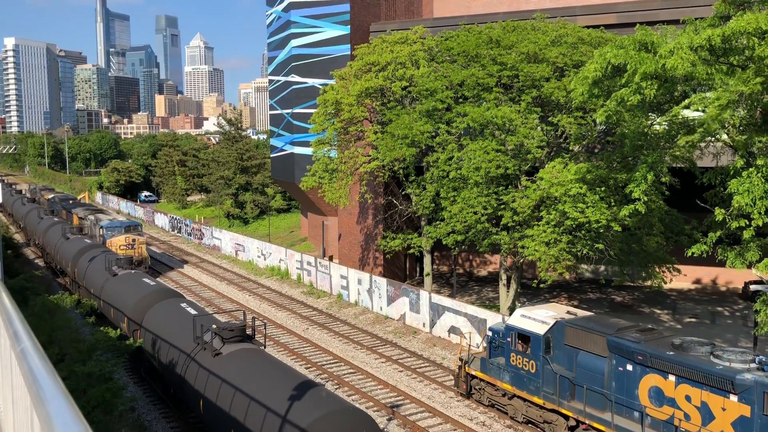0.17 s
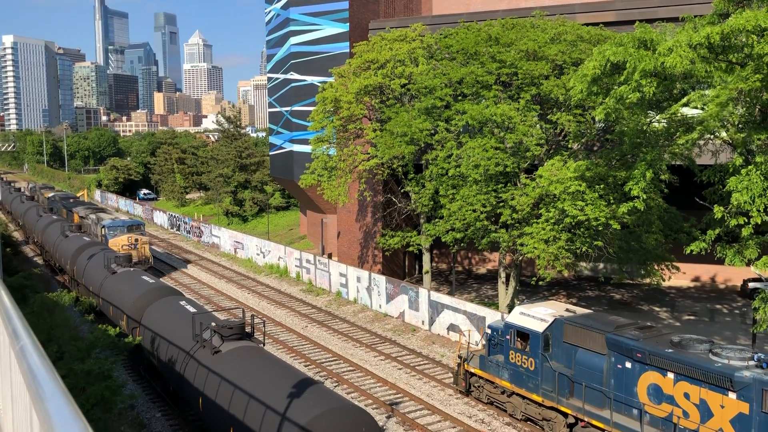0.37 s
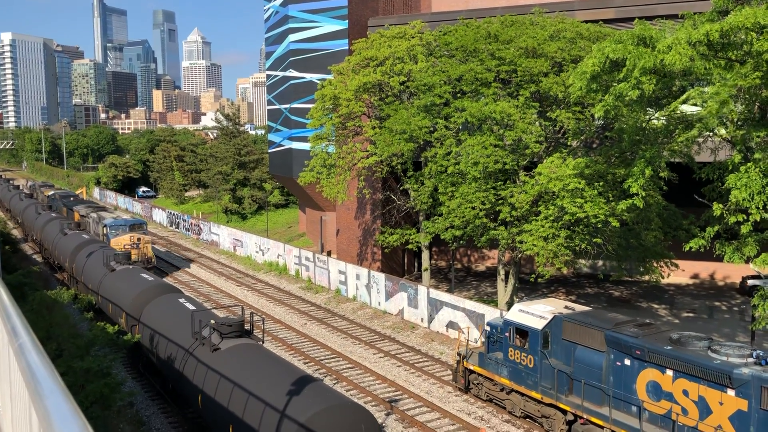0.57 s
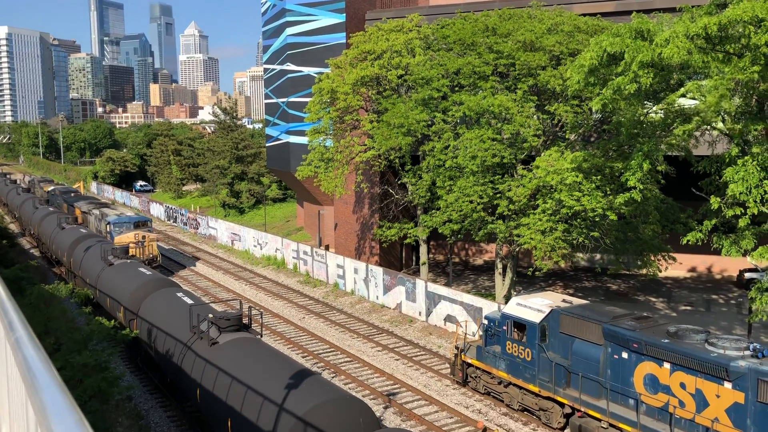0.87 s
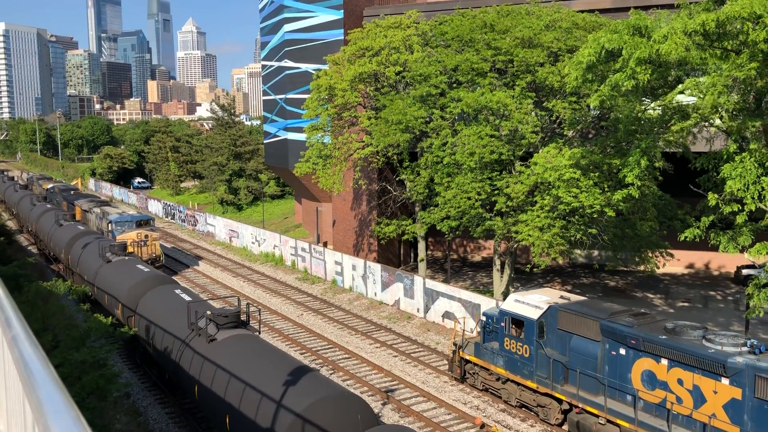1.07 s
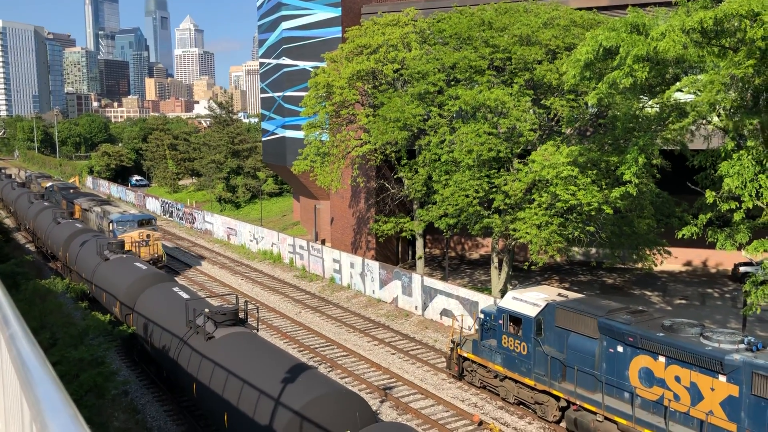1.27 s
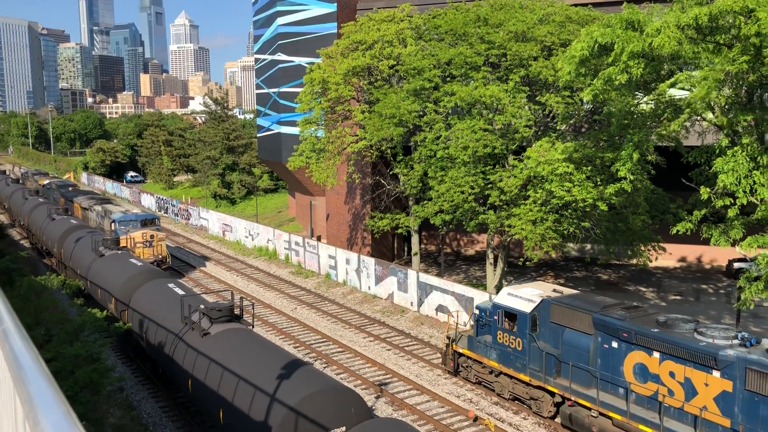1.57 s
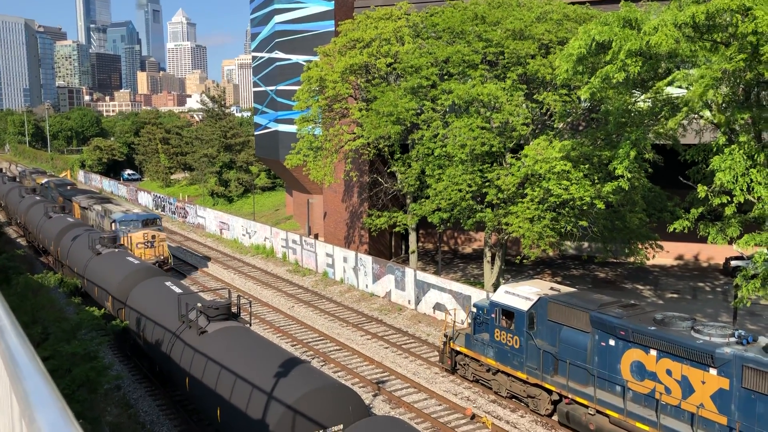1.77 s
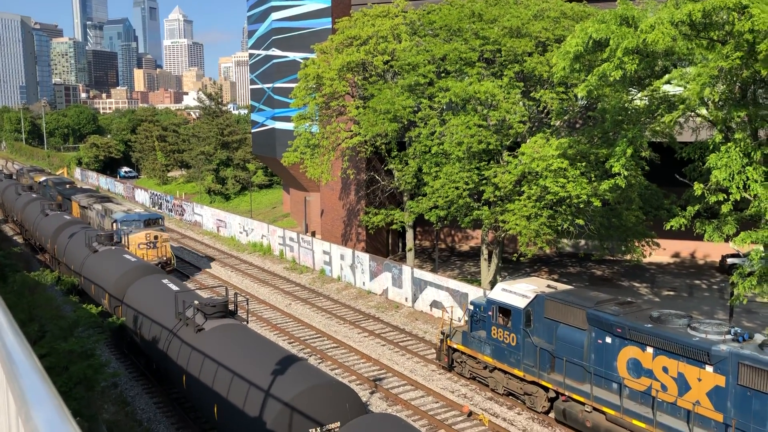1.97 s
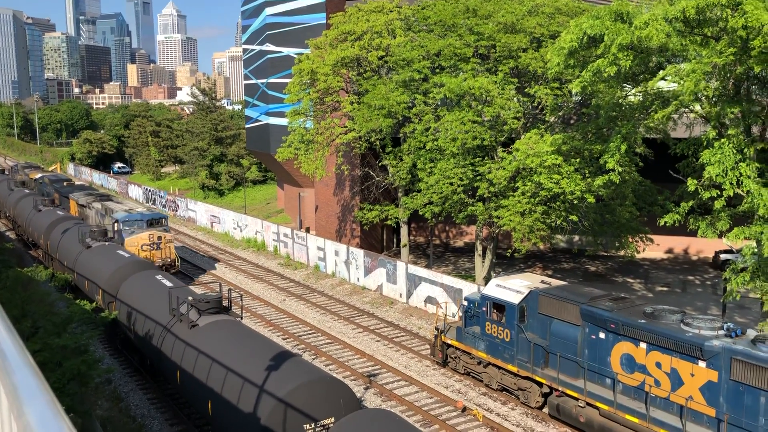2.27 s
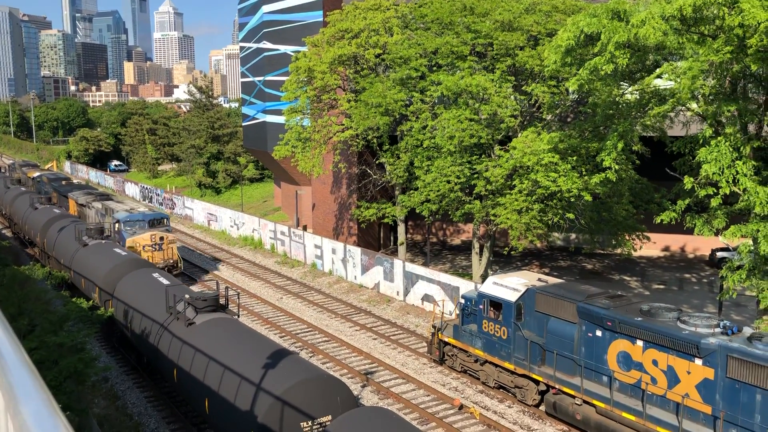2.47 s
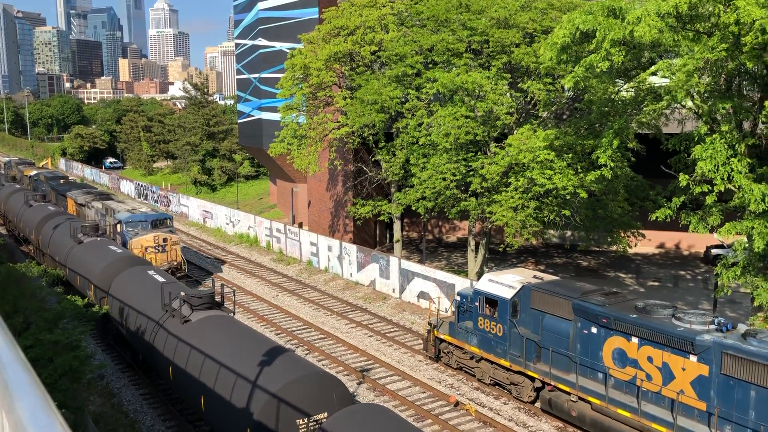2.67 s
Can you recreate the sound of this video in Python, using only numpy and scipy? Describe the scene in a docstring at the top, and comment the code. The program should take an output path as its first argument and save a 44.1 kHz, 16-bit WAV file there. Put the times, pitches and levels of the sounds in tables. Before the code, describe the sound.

Heavy diesel locomotive engines drone steadily below, rumbling and whining while wind puffs bump the microphone

```python
"""In a cutting below the microphone two big sixteen-cylinder two-stroke diesel locomotives idle, out of step.
Trains of uneven firing impulses excite exhaust resonances and beat; engine orders, gears and turbocharger
whine as sines; the turbocharger whistles hoarsely as noise-modulated carriers; fans and machinery roar
as shaped noise. Brief bursts of low resonant noise are puffs of wind that thump the microphone."""
import sys
import numpy as np
from scipy import signal
from scipy.fft import rfft, irfft, next_fast_len
from scipy.io import wavfile

SR = 44100
rng = np.random.default_rng(int(sys.argv[2]) if len(sys.argv) > 2 else 0)


def volts_from_db(level):
    """Convert decibel levels to linear amplitude ratios."""
    exponent = np.asarray(level, float) / 20
    return 10 ** exponent


def master(y):
    """Save y as 16-bit WAV."""
    cut = np.clip(np.atleast_2d(y).T, -1, 1)
    pcm = np.round(cut * 32767)  # scale
    wavfile.write(sys.argv[1], SR, pcm.astype(np.int16))


N = 124803
T = np.arange(N) / SR  # s
HZ = np.arange(N // 2 + 1) * SR / N
CRANK_HZ = 5.243  # turns per second of the first locomotive


def level(x, db):
    """Normalisation: the signal is scaled to an rms level in dB."""
    return x * volts_from_db(db) / np.sqrt(np.mean(x ** 2))


def ring(hz, width):
    """Second-order resonance: complex response with gain 1 at its centre and a half-power width in Hz."""
    return 1j * HZ * width / (hz ** 2 - HZ ** 2 + 1j * HZ * width)


def walk(rate):
    """Random modulation: white noise under a Gaussian low-pass of about rate Hz, standard deviation 1."""
    size = next_fast_len(N)
    hz = np.arange(size // 2 + 1) * SR / size
    low_pass = np.exp(-(hz / rate) ** 2) * (hz > 0)  # no steady offset
    wander = irfft(rfft(rng.standard_normal(size)) * low_pass, size)[:N]
    return wander / wander.std()


def curve_gain(points):
    """Slow envelope: gain interpolated in dB between points of (s, dB)."""
    seconds, db = np.array(points).T
    return volts_from_db(np.interp(T, seconds, db))


def swing(depth, at):
    """Amplitude modulation: the gain rises and falls once a crank turn, loudest at turn fraction at."""
    return 1 + np.clip(depth, 0, 1) * np.cos(2 * np.pi * (CRANK_HZ * T - at))


def twisted(turns, depth, at):
    """Single-sideband modulation: one lower side tone rocks level and pitch together once a crank turn."""
    side_turns = turns - CRANK_HZ * T + at
    return np.sqrt(2) * (np.sin(2 * np.pi * turns) + depth * np.sin(2 * np.pi * side_turns))


def firings(crank_hz, first_s, cylinders):
    """Impulse excitation: one uneven blow per cylinder and crank turn rings the exhaust."""
    # Exhaust resonances. Each row: centre in Hz, width in Hz, gain in dB.
    exhaust = [(47, 6.4, -7.5), (167.3, 48, -18), (254.5, 69, -20.5), (407, 43, -28), (580, 93, -31),
               (770, 350, -32)]
    firing_db, scatter_db, scatter_ms = -35.5, .8, .15
    turns = int(N / SR * crank_hz) + 1
    strength_db, lag_ms = np.tile(np.array(cylinders), (turns, 1)).T
    time_chance, strength_chance = rng.standard_normal((len(lag_ms), 2)).T
    even_s = first_s + np.arange(len(lag_ms)) / len(cylinders) / crank_hz
    at = even_s + (lag_ms + scatter_ms * time_chance) / 1000
    blows = np.zeros(2 * N)
    blows[(at * SR).astype(int)] = volts_from_db(strength_db + scatter_db * strength_chance)
    boom = ring(80, 30) ** 2  # main boom of the exhaust stack
    pipe = boom + sum(volts_from_db(db) * ring(hz, width) ** 2 for hz, width, db in exhaust)
    return irfft(rfft(blows[:N]) * pipe, N) * volts_from_db(firing_db) * SR / crank_hz / 2


def engines():
    """Beating: two periodic firing patterns at slightly different crank rates drift against each other."""
    # Cylinders of each locomotive in firing order.
    # Each row: relative strength in dB, lag through the exhaust manifold in ms.
    first_cylinders = [(-1.9, -3.0), (-7.2, 3.7), (-2.4, -2.7), (-3.3, -1.5), (-1.0, -1.9), (-2.8, -1.3),
                       (-5.7, -4.5), (-8.5, -2.1), (-3.9, -3.3), (-5.4, -0.1), (-2.2, 3.9), (-7.1, 1.5),
                       (-7.4, 3.3), (-4.4, 4.6), (-2.1, -0.7), (1.8, 2.6)]
    second_cylinders = [(-6.4, 4.1), (-4.7, -0.4), (-3.1, 4.5), (-2.2, 0.1), (-2.4, 3.7), (-3.4, -3.3),
                        (-3.4, 3.8), (0.1, -2.7), (-8.5, 1.4), (-1.7, -4.0), (-4.9, -0.7), (-2.6, -4.5),
                        (-9.7, -4.1), (-9.2, 1.2), (-3.3, -3.0), (-7.9, 4.1)]
    first = firings(CRANK_HZ, first_s=.014, cylinders=first_cylinders)
    second = firings(crank_hz=5.311, first_s=.012, cylinders=second_cylinders)
    return first + second


def whines():
    """Tonal radiation: engine-order, gear and turbocharger tones wander a little in level and pitch."""
    # Each row: tone in Hz, level in dB rms before its side tone, relative side tone (0 for none),
    # loudest point as a fraction of a crank turn, level wander in dB.
    tones = [(67.3, -38, 0, 0, 1), (71.7, -44, 0, 0, 2), (162.5, -39.5, 0, 0, 1.5), (188.7, -45, 0, 0, 2),
             (256.9, -44, 0, 0, 2), (262.2, -45, 0, 0, 2), (419.5, -43, 1, .66, 1.5),
             (690.4, -46, .1, 0, 2), (756.5, -44.5, .05, .2, 3), (760.2, -50, 0, 0, 2),
             (839.2, -48, .1, 0, 2), (1242.6, -45, .15, .8, 2), (1263.9, -55, .1, 0, 2),
             (1479.7, -49, .1, 0, 2), (1518.3, -44, .75, .96, 2), (1585.4, -54, .1, 0, 2),
             (1889.8, -59, .1, 0, 2), (2268, -58, .3, 0, 2), (2485.2, -61, .1, 0, 2), (2520, -62, .4, 0, 2),
             (2707.1, -56, .2, 0, 2), (2726.6, -61, .1, 0, 2), (2811.6, -55, .2, 0, 2),
             (2911.7, -63, .1, 0, 2), (3018, -58, .6, 0, 2), (3398, -63, .1, 0, 2), (3525.3, -65, .1, 0, 2),
             (3586.7, -62, .1, 0, 2), (3649, -64, .1, 0, 2), (3777.5, -59, .2, 0, 2),
             (3793.2, -62, .1, 0, 2), (4429, -50, .5, .4, 4), (4476, -48.5, .5, .4, 4),
             (4519, -52, .5, .4, 4), (4562, -61, .3, .4, 3), (5343, -68, .1, 0, 2)]
    drift_hz, wander_per_s = .25, 3
    total = 0
    for hz, db, depth, at, wander_db in tones:
        gain = volts_from_db(db + wander_db * walk(wander_per_s))
        turns = np.cumsum(hz + drift_hz * walk(wander_per_s)) / SR + rng.random()
        total = total + gain * twisted(turns, depth, at)
    return total


def gear_whine(hz, depth, at, points):
    """Amplitude modulation of a sine: a strong gear tone follows a level curve and the crank's swing."""
    return curve_gain(points) * swing(depth, at) * np.sqrt(2) * np.sin(2 * np.pi * hz * T)


def gear_whines():
    """Superposition: the loudest gear whine and a lower one add as independent tones."""
    # Level curves of the two whines. Each row: time in seconds, level in dB rms before the crank's swing.
    main_points = [(0.0, -38), (0.86, -41.5), (0.9, -38), (1.03, -48), (1.09, -38.5), (1.82, -42),
                   (1.9, -40), (2.77, -42), (2.83, -41)]
    low_points = [(0, -44), (.15, -41.5), (.45, -46), (.85, -42), (1.3, -43), (2.0, -42), (2.3, -43),
                  (2.5, -47), (2.83, -46)]
    main = gear_whine(hz=2769.1, depth=.2, at=.85, points=main_points)
    low = gear_whine(hz=2095.6, depth=.25, at=.55, points=low_points)
    return main + low


def whistles():
    """Turbulent scattering: quadrature noise spreads blade tones into fuzzy bands, overtones wider."""
    # Each row: blade rate in Hz, spread in Hz, swing per crank turn from 0 to 1,
    # loudest point as a fraction of a turn, list of levels in dB rms of blade tone and overtones.
    blade_tones = [(4456, 66, 0.18, 0.38, [-40.3, -57, -67.5]), (5834, 100, 0.2, 0.7, [-51])]
    # Shared swell of the blade tones. Each row: time in seconds, relative level in dB.
    swell_points = [(0, 1), (.45, -0.5), (.7, -2.3), (1.1, -4), (1.35, 0.5), (1.55, -1), (2.2, -4.5),
                    (2.45, 1), (2.83, -7)]
    waver_hz, wavers_per_s = 13, 10
    skirt_share, skirt_wider = .35, 2.6  # grainy spread around a whistle
    swell = curve_gain(swell_points)
    total = 0
    for hz, spread, depth, at, dbs in blade_tones:
        turns = np.cumsum(hz + waver_hz * walk(wavers_per_s)) / SR
        for k, db in enumerate(dbs, 1):
            phase = 2 * np.pi * k * turns
            a, b = (walk(k * spread) + skirt_share / k * walk(skirt_wider * k * spread) for _ in range(2))
            gain = swing(depth, at) * swell if k == 1 else 1  # overtones have no swing or swell
            total = total + level((a * np.sin(phase) + b * np.cos(phase)) * gain, db)
    return total


def roar():
    """Broadband noise of fans, intake and machinery: octave bands swell together and flicker alone."""
    # Noise spectrum. Each row: frequency in Hz, relative density in dB per Hz.
    spectrum = [(25, -30), (42, -20), (58, -28), (70, -8), (98, -19), (130, -13), (200, -13), (270, -17),
                (330, -21), (500, -17), (763, -19.5), (1140, -26), (1600, -27.5), (2560, -33),
                (3350, -34.5), (4400, -31.5), (4890, -36), (6000, -41), (9080, -51), (10300, -56),
                (11600, -56.5), (12800, -63), (15600, -69)]
    swell_db, flicker_db = .6, 1.5
    octave = np.log2(np.maximum(HZ, 1))
    hz, db = np.array(spectrum).T
    noise = rfft(rng.standard_normal(N)) * volts_from_db(np.interp(octave, np.log2(hz), db))
    swell = swell_db * walk(0.43)
    total = 0
    for centre in range(4, 16):  # octaves above 1 Hz
        overlap = np.clip(1 - abs(octave - centre), 0, 1)  # triangles that sum to 1 from 16 Hz up
        total = total + irfft(noise * overlap, N) * volts_from_db(swell + flicker_db * walk(12))
    return level(total, -27)


def wind():
    """Pressure fluctuation at the membrane: Gaussian bursts of low resonant noise are short dull puffs."""
    # Each row: centre in seconds, length in seconds to either side (where the gain is exp(-2)),
    # noise level in dB rms before the burst's envelope, width of the resonance in Hz.
    puffs = [(.115, .035, -20.5, 330), (.28, .02, -24, 400), (.33, .02, -21, 280), (.385, .03, -20, 400),
             (.74, .045, -20.5, 360), (1.335, .014, -21, 240), (1.755, .014, -21, 220),
             (1.95, .012, -22, 240), (2.05, .015, -22, 280), (2.24, .014, -21, 300), (2.59, .016, -19, 280)]
    low_hz = 55  # the resonance centres on the geometric mean of this and its width
    noise = rfft(rng.standard_normal(N))
    total = 0
    for centre_s, length_s, db, width_hz in puffs:
        dull = irfft(noise * ring(np.sqrt(low_hz * width_hz), width_hz) ** 3, N)
        total = total + level(dull, db) * np.exp(-2 * ((T - centre_s) / length_s) ** 2)
    return total


def scene():
    """Superposition: the pressures of all sources add in one channel."""
    return (engines() + whines() + gear_whines() + whistles() + roar() + wind())[None]


def top_cut(x):
    """Nothing passes above the cut-off."""
    return signal.sosfilt(signal.butter(12, 15760, fs=SR, output="sos"), x)


def record(dry):
    """High-pass filtering: the microphone cuts the deepest bass steeply, below 30 Hz."""
    high_pass = signal.butter(6, 30, "high", fs=SR, output="sos")
    mix = signal.sosfilt(high_pass, dry)
    return top_cut(mix)


dry = scene()
out = record(dry)
master(out)
```